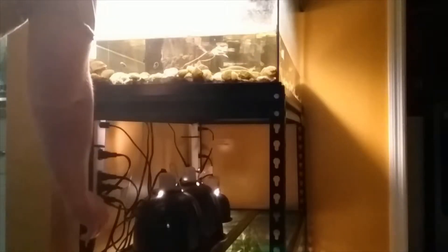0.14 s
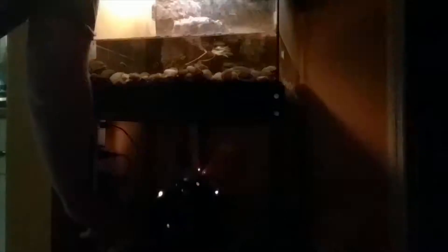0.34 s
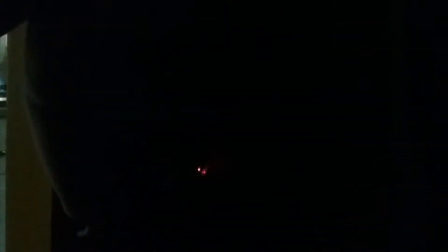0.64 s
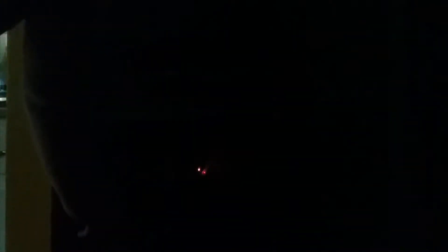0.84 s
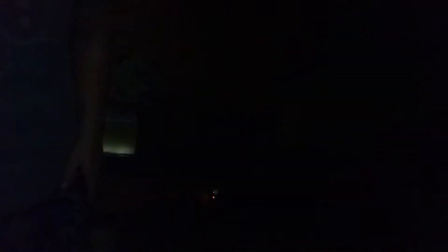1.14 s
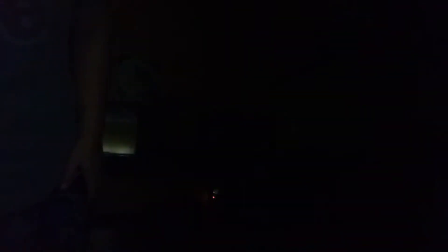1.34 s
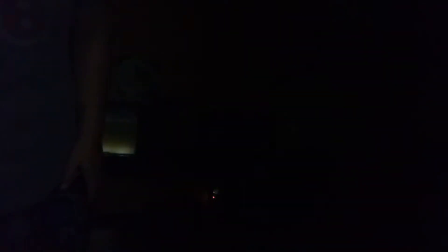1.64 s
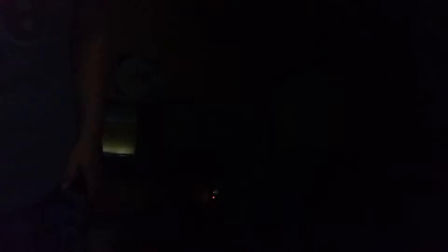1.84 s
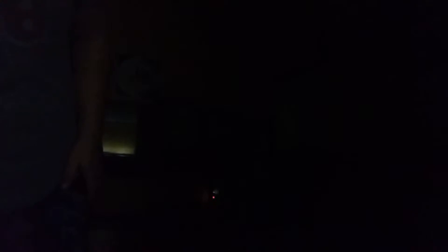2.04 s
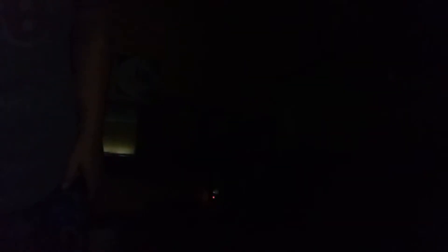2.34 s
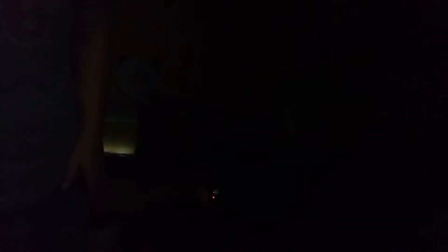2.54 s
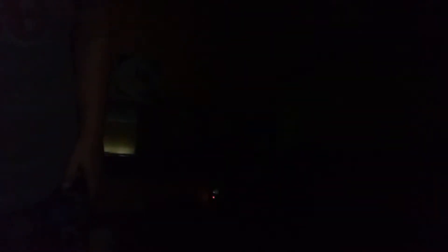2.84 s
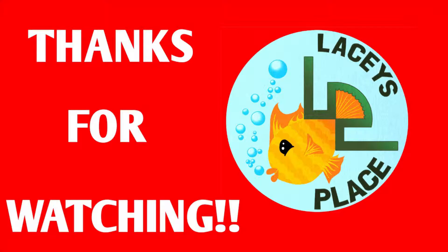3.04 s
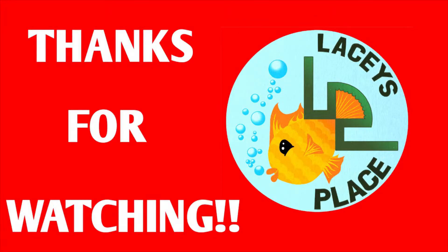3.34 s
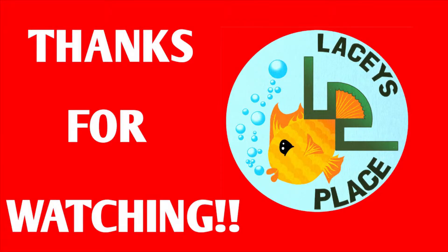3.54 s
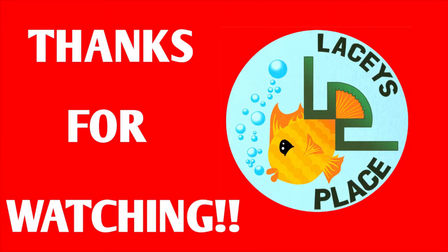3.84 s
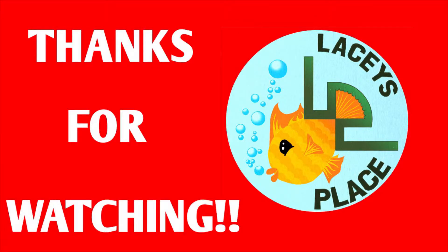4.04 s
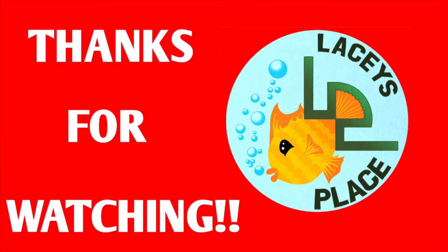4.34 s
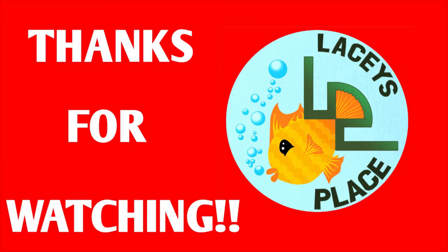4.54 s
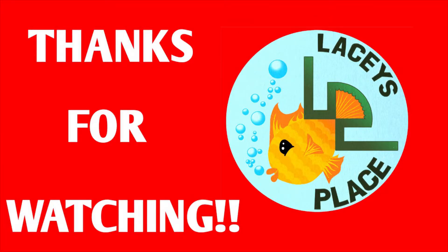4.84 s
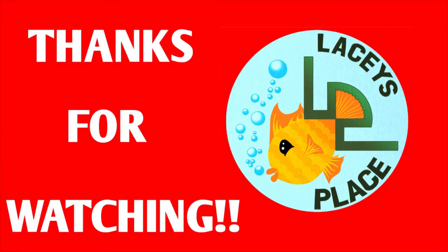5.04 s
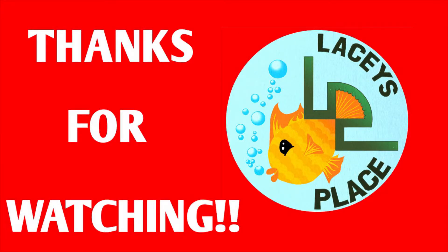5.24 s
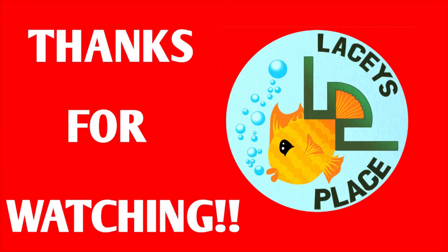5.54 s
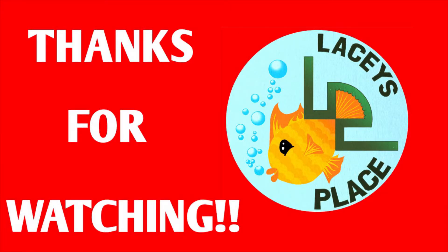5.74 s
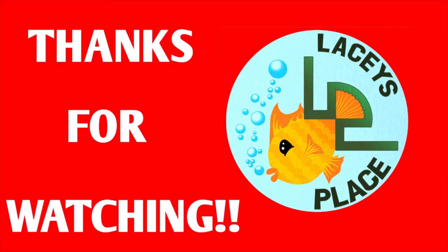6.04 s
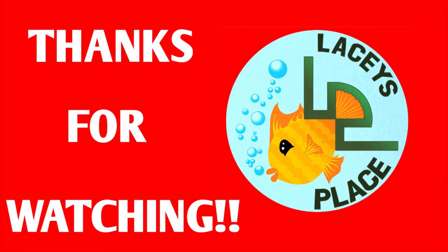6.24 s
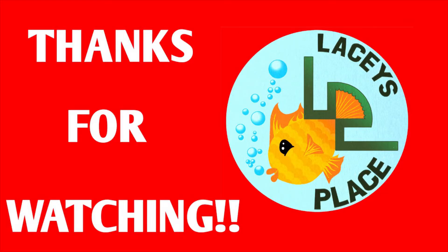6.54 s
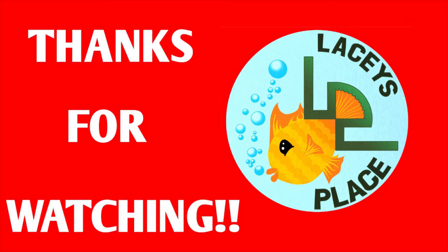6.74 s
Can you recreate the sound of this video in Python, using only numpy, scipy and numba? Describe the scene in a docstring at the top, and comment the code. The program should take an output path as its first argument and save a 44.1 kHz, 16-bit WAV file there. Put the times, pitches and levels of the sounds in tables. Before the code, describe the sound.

Aquarium filters pour bubbling water over a steady pump hum in a small room, with a light switch click and a few ticks.

```python
"""Aquarium filters in a small, hard room

Filters pour water into fish tanks over the hum of their mains pumps. Countless bubbles ring in the
falling water; now and then a larger one bursts with a bright spit. Two close microphones on a hand-held
camera listen beside a pump as a light is switched off, then, from 0.87 s, further into the room, with
three dry ticks and one bump on the camera. Silence from 6.35 s."""
import sys
import numpy as np
from scipy import signal
from scipy.fft import rfft, irfft
from scipy.io import wavfile
from numba import njit

SR = 44100
rng = np.random.default_rng(int(sys.argv[2]) if len(sys.argv) > 2 else 0)


def store_wav(level_fs):
    """Save 16-bit WAV to argv[1]."""
    pcm = np.round(np.clip(np.atleast_2d(level_fs), -1, 1) * 32767)
    wavfile.write(sys.argv[1], SR, pcm.T.astype(np.int16))


N = 303849
TIME_S, BINS_HZ = np.arange(N) / SR, np.fft.rfftfreq(N, 1 / SR)
CLICK_BINS_HZ = np.fft.rfftfreq(128, 1 / SR)
MIC_DELAY_S = 20 / SR

# NEAR: beside the pump. FAR: out in the room.
# water spectrum (frequency [Hz], density [dB per Hz])
NEAR_WATER = [(35, -100), (70, -82.5), (140, -72.5), (300, -72.5), (600, -70), (800, -71), (1200, -74.5),
              (1700, -77), (3000, -81), (4300, -89.5), (7000, -90), (9500, -93.5), (13000, -86.5),
              (15400, -87)]
FAR_WATER = [(35, -105), (70, -77), (140, -76.5), (300, -77.5), (600, -71.5), (800, -73), (1200, -77.5),
             (1700, -81.5), (3000, -86.5), (4300, -93), (5000, -91.5), (7000, -93.5), (9500, -96.5),
             (13000, -92), (15400, -90.5)]
# outflow swell, used about its mean (time [s], gurgle [dB], splash [dB])
NEAR_FLOW = [(0.0, -37.5, -47.5), (0.802, -37, -49.5), (0.86, -39.5, -48.5)]
FAR_FLOW = [(0.88, -43.5, -54), (1.42, -40.5, -51), (3.32, -42.5, -56), (3.36, -41, -48.5),
            (3.73, -40.5, -50.5), (6.0, -41.5, -50.5), (6.2, -42.5, -57.5), (6.32, -44, -52)]
# bubbles' part of the water (frequency [Hz], power share [ratio])
BUBBLE_SHARE = [(150, 0.033), (400, 0.65), (1200, 0.6), (4000, 0.76), (8000, 0.94), (14000, 0.71)]
# unevenness of bubble strength (pitch [Hz], share of spread [ratio])
BUBBLE_SPREAD = [(1500, 1), (3000, 1), (5000, .6), (14000, .65)]
# surface bursts (time [s], relative level [dB], direct over room [dB], body over spit [dB])
POPS = [(0.286, -41, -5, -11.5), (1.201, -47.5, -13, -7), (1.64, -46, -17, -12), (2.012, -40.5, -19, -17.5),
        (2.221, -52.5, -15, 1), (2.490, -45, -18, -6), (2.717, -48, -12, -16), (2.846, -48, -10, -18),
        (2.985, -49, -17, 4.5), (3.144, -47.5, -8.5, -2.5), (3.765, -45, -12.5, -2),
        (3.869, -48.5, -13, -12.5), (4.143, -61, -13, -12), (4.195, -52, -5, 8), (4.558, -46.5, -7, -8),
        (4.640, -42, -19, 2.5), (5.553, -39.5, -16, -28), (6.149, -46.5, -10, -6)]
# spectra of a burst's two parts (frequency [Hz], gain [dB])
POP_SPIT = [(2000, -32), (5000, -15), (9500, -2), (12500, 4), (15400, 5.5)]
POP_BODY = [(150, -31.5), (500, -7), (1400, 12.5), (3000, 5.5), (6000, 1.5), (10000, -18.5)]
# single bubbles and, at 4.667 s, the faint bright ring of the knock on the camera
# (time [s], pitch [Hz], relative level [dB])
SINGLE_RINGS = [(0.02, 1166, -41), (0.29, 2900, -47), (0.395, 800, -39), (0.400, 950, -39.5),
                (0.503, 7250, -47), (0.674, 5250, -50.5), (0.728, 614, -39.5), (1.302, 1320, -40.5),
                (1.661, 3100, -50.5), (1.948, 6250, -49), (3.692, 2430, -46), (4.16, 750, -36.5),
                (4.193, 1960, -48), (4.63, 1420, -43.5), (4.667, 2800, -56), (4.791, 1050, -44.5),
                (5.232, 2690, -45.5), (5.359, 1130, -43.5), (5.686, 3530, -54), (5.87, 1310, -49.5),
                (5.964, 4060, -49), (6.262, 1717, -44.5)]
# pump lines (frequency [Hz], left [dB], right [dB], left lead [rad])
NEAR_HUM = [(60, -70, -72, 0), (115.8, -66, -54, 0), (120, -47.8, -49, .3), (240, -50, -66, -.8),
            (360, -50, -47, -1.5), (480, -45, -55, -.4), (575, -47, -51, .3), (597, -50, -50, .4)]
FAR_HUM = [(120, -50.7, -62, 1.2), (155, -56.5, -59, -2.0), (180, -57.5, -57, -1.4), (240, -57, -55, 1.3),
           (360, -52.3, -59.5, 0), (420, -59, -61, .4), (480, -57.5, -55, -.6), (540, -68, -60, 0),
           (600, -56.5, -62, 0), (660, -56.5, -62, .4), (720, -57.5, -55.5, .2), (780, -56, -57.5, .2),
           (1020, -68, -66, 0), (1200, -66, -65, 0)]
# switch contacts (time [s], relative level [dB], direct over room [dB])
SWITCH_CONTACTS = [(0.568, -33, -8), (0.575, -31, -5.5)]
# switch case response (frequency [Hz], gain [dB])
SWITCH_CASE = [(300, -30), (1100, 9), (1700, -11), (2500, 3.5), (3600, 0.5), (5500, -3.5), (8500, -9.5),
               (11500, -2.5), (14000, 6.5), (15400, 8.5)]
# dry ticks (time [s], level as a 1 ms burst [dB], decay [s])
TICKS = [(1.3991, -36, .0006), (3.3408, -40.5, .001), (3.3701, -24.5, .0019)]
# tick spectrum (frequency [Hz], gain [dB])
TICK_COLOUR = [(1000, -19.5), (2500, -12), (3700, -8), (5700, -11), (8500, -4), (11500, -1), (15000, 3),
               (17000, -15.5)]
# camera body modes (frequency [Hz], relative level [dB], t60 [s])
BUMP_MODES = [(100, 9, 0.062), (160, 11, 0.045), (235, 3, .025), (330, 4.5, .025)]
# room decay (frequency [Hz], t60 [s])
ROOM_T60 = [(200, 0.56), (1500, 0.32), (6000, 0.4), (15000, 0.35)]
# standing waves (frequency [Hz], width [Hz], lift [dB])
ROOM_MODES = [(113.7, 5.4, 6), (159, 7.6, 5.5), (225, 35, 8), (280, 20, 2), (350, 43, 5.5), (471, 14, 7),
              (537, 18, 3)]
# likeness of the room sound at the two microphones (frequency [Hz], correlation [ratio])
MIC_CORRELATION = [(50, 0.95), (120, 0.95), (300, 0.84), (550, 0.48), (850, 0.21), (1500, -0.56),
                   (2300, 0.28), (3200, 0.21), (5000, 0.0079)]
# part subtracted from the other microphone (frequency [Hz], gain [ratio])
CROSSFEED = [(100, 1), (2000, 0.92), (4400, 0.69), (8000, 0.62), (14000, 0.43)]
# listening position (time [s], gain [ratio])
NEAR_GATE = [(0, 1), (0.868, 1), (0.8695, .12), (0.873, .12), (0.8745, 0)]
FAR_GATE = [(0.873, 0), (0.8745, 1), (6.318, 1), (6.328, .06), (6.345, 0)]
# channel balance (frequency [Hz], left over right [dB])
BALANCE = [(100, 1.4), (400, 1.5), (1200, -0.62), (4000, -0.69), (10000, -1.1), (15000, -.2)]


def running_water(count=4, flutter_db=0.73, flutter_hz=33.0):
    """Bubbling outflows over the smooth wash of their streams; the spray flutters."""
    share = np.clip(read(BUBBLE_SHARE, BINS_HZ), 0, 1)
    outflows = unit_rms(sum(bubbles() for _ in range(count)))
    wash = rng.standard_normal((2, N))
    water = shaped(outflows, np.sqrt(share)) + shaped(wash, np.sqrt(1 - share))
    spray = water - lowpass(water, hz=2500)
    return water - spray + spray * gain_of(flutter_db * drift(flutter_hz))


def bubbles(count=4400, spread_db=4.0, decay_cycles=6.87, rise=0.011, direct_db=-9.0):
    """One outflow's bubbles in the room; most are faint, the smallest are the most even."""
    when, pitch, force, sustain = rng.random((count, 4)).T
    hz = 220 * (16000 / 220) ** pitch
    strength = np.minimum(-np.log(1 - force), 4) - np.sqrt(2)
    amplitude = hz * gain_of(spread_db * read(BUBBLE_SPREAD, hz) * strength)
    sound = ring((when * N).astype(int), hz / SR, amplitude, decay_cycles * (.5 + sustain), rise)
    return unit_rms(signal.oaconvolve(sound[None], room(direct_db), axes=1)[:, :N])


@njit
def ring(start, cycles_per_sample, amplitude, decay_cycles, rise):
    """Each bubble is a dying sine whose pitch rises as it nears the surface."""
    out = np.zeros(N)
    for k in range(len(start)):
        for i in range(min(int(5 * decay_cycles[k] / cycles_per_sample[k]), N - start[k])):
            turns = i * cycles_per_sample[k]
            age = turns / decay_cycles[k]
            out[start[k] + i] += amplitude[k] * np.exp(-age) * np.sin(2 * np.pi * turns * (1 + rise * age))
    return out


def surging(water, spectrum, flow, splash_follow=0.53, fizz_follow=0.69):
    """Colours the water; gurgle, splash and fizz swell with the flow over a steady rumble."""
    water = shaped(water, gain_of(read(spectrum, BINS_HZ)) * np.sqrt(SR / 2))
    s, *levels = np.transpose(flow)
    span_s = np.linspace(s[0], s[-1])
    gurgle_db, splash_db = (np.interp(TIME_S, s, db) - np.interp(span_s, s, db).mean() for db in levels)
    rumble, low, mid = (lowpass(water, hz) for hz in (200, 1800, 8000))
    gurgle = (low - rumble) * gain_of(gurgle_db)
    splash = (mid - low) * gain_of(splash_follow * splash_db)
    fizz = (water - mid) * gain_of(fizz_follow * splash_db)
    return rumble + gurgle + splash + fizz


def pops(gain_db=28.0):
    """Bubbles burst at the surface: a bright spit with more or less body."""
    out = np.zeros((2, N))
    spit = gain_of(read(POP_SPIT, CLICK_BINS_HZ))
    for s, db, direct_db, body_db in POPS:
        body = gain_of(body_db + read(POP_BODY, CLICK_BINS_HZ))
        add(out, s, gain_of(db + gain_db) * snap(spit + body, direct_db))
    return out


def single_rings(decay_cycles=6.0, rise=0.00276, gain_db=-2.5, direct_db=-7.5):
    """Single bubbles, and once the knocked camera, ring into the room; levels as for a 50 ms note."""
    out = np.zeros((2, N))
    for s, hz, db in SINGLE_RINGS:
        turns = hz * np.arange(SR // 10) / SR
        age = turns / decay_cycles
        note = np.exp(-age) * np.sin(2 * np.pi * turns * (1 + rise * age))
        heard = signal.oaconvolve(note[None], room(direct_db), axes=1)
        add(out, s, gain_of(db + gain_db) * unit_rms(heard) * np.sqrt(SR / 20 / heard.shape[1]))
    return out


def pump_hum(lines, waver_db, wander_rad, waver_hz=8.1, restless_hz=340.):
    """Mains pump lines waver in level and phase, less so below restless_hz."""
    out = np.zeros((2, N))
    drifts = [drift(waver_hz) for _ in range(2)]
    for hz, left_db, right_db, lead_rad in lines:
        swell, sway = (min(hz / restless_hz, 1) * np.roll(d, rng.integers(N)) for d in drifts)
        phase = 2 * np.pi * (hz * TIME_S + rng.random()) + wander_rad * sway
        pair = np.array([gain_of(left_db) * np.sin(phase + lead_rad), gain_of(right_db) * np.sin(phase)])
        out += np.sqrt(2) * unit_rms(gain_of(waver_db * swell)) * pair
    return out


def light_switch(gain_db=28.0):
    """The rocker flips and strikes its stop; each contact rings the plastic case."""
    out = np.zeros((2, N))
    case = gain_of(read(SWITCH_CASE, CLICK_BINS_HZ))
    for s, db, direct_db in SWITCH_CONTACTS:
        add(out, s, gain_of(db + gain_db) * snap(case, direct_db))
    return out


def ticks(room_db=1.2, left_db=-3.0):
    """A small hard thing rings close by: right microphone first, then left, then the room."""
    direct, echo = np.zeros((2, 2, N))
    t = np.arange(1024) / SR
    colour = gain_of(read(TICK_COLOUR, np.fft.rfftfreq(len(t), 1 / SR)))
    for s, db, decay_s in TICKS:
        burst = irfft(rfft(rng.standard_normal(len(t))) * colour) * np.exp(-t / decay_s)
        tick = gain_of(db) * unit_rms(burst)[None] * np.sqrt(SR / 1000 / len(t))
        add(direct, s, tick * [[0], [1]])
        add(direct, s + MIC_DELAY_S, tick * [[gain_of(left_db)], [0]])
        add(echo, s, gain_of(room_db) * signal.oaconvolve(tick, room(direct_db=-19), axes=1))
    return direct + microphones(echo)


def bump(at_s=4.6668, peak_db=-20, low_cut_hz=84.7, right_db=-2.0):
    """A dull knock through the camera body drives the channels in opposite directions."""
    out, t = np.zeros((2, N)), np.arange(SR // 8) / SR
    modes = sum(gain_of(db - 60 * t / t60_s) * np.sin(2 * np.pi * hz * t) for hz, db, t60_s in BUMP_MODES)
    knock = signal.sosfilt(signal.butter(3, low_cut_hz, "high", fs=SR, output="sos"), modes)
    pair = np.array([knock, -gain_of(right_db) * knock])
    add(out, at_s, gain_of(peak_db) * pair / abs(pair).max())
    return out


def snap(colour, direct_db):
    """A short coloured click, heard directly and through the room."""
    click = np.fft.fftshift(irfft(colour))
    return signal.oaconvolve(room(direct_db, direct_decay_s=0.002), click[None], "same", axes=1)


def room(direct_db, direct_decay_s=0.0026):
    """Unit-energy paths to both microphones: a brief direct cluster and a diffuse tail."""
    hz, frame_s, noise = signal.stft(rng.standard_normal((2, SR // 2)), SR, nperseg=256)
    decay = gain_of(-60 * frame_s / read(ROOM_T60, hz)[:, None])
    tail = signal.istft(noise * decay, SR, nperseg=256)[1]
    t = np.arange(tail.shape[1]) / SR
    direct = rng.standard_normal(tail.shape) * np.exp(-t / direct_decay_s)
    return unit_rms(unit_rms(tail) + gain_of(direct_db) * unit_rms(direct)) / np.sqrt(len(t))


def standing_waves(water):
    """Low room resonances lift narrow bands of the water's rumble."""
    lift_db = sum(db / (1 + (2 * (BINS_HZ - hz) / width_hz) ** 2) for hz, width_hz, db in ROOM_MODES)
    return shaped(water, gain_of(lift_db))


def microphones(field):
    """A close pair, widened: each channel subtracts the other, delayed, and is equalised flat."""
    alike = np.clip(read(MIC_CORRELATION, BINS_HZ), -.99, .99)
    other = np.clip(read(CROSSFEED, BINS_HZ), 0, 1) * np.exp(-2j * np.pi * BINS_HZ * MIC_DELAY_S)
    to_mid, to_side = np.sqrt(1 + alike) * (1 - other), np.sqrt(1 - alike) * (1 + other)
    norm = np.sqrt(2 * (abs(to_mid) ** 2 + abs(to_side) ** 2))
    mid = shaped(field[0] + field[1], to_mid / norm)
    side = shaped(field[0] - field[1], to_side / norm)
    return np.array([mid + side, mid - side])


def gain_of(db):
    """Decibels to amplitude."""
    return 10 ** (np.asarray(db) / 20)


def unit_rms(x):
    """Scales to rms 1."""
    return x / np.sqrt(np.mean(x ** 2) + 1e-20)


def read(table, hz):
    """Interpolates on a log frequency axis."""
    table_hz, value = np.transpose(table)
    return np.interp(np.log(hz + 1), np.log(table_hz + 1), value)


def shaped(x, gain):
    """Filters by a gain per bin."""
    return irfft(rfft(x) * gain, N)


def lowpass(x, hz):
    """Zero phase, 24 dB per octave."""
    return shaped(x, 1 / (1 + (BINS_HZ / hz) ** 4))


def drift(hz):
    """Random motion of rms 1, up to about hz."""
    return unit_rms(shaped(rng.standard_normal(N), np.exp(-(BINS_HZ / hz) ** 2) * (BINS_HZ > 0)))


def add(mix, at_s, sound):
    """Mixes in a stereo sound."""
    part = mix[:, round(at_s * SR):][:, :sound.shape[1]]
    part += sound[:, :part.shape[1]]


def scene():
    """Two listening positions in turn; the level dips briefly between them."""
    near, far = (np.interp(TIME_S, *np.transpose(gate)) for gate in (NEAR_GATE, FAR_GATE))
    water = running_water()
    near_water = near * surging(water, NEAR_WATER, NEAR_FLOW)
    far_water = far * surging(standing_waves(water), FAR_WATER, FAR_FLOW)
    events = (near + far) * (pops() + single_rings() + light_switch())
    heard = microphones(near_water + far_water + events) + ticks()
    near_hum = near * pump_hum(NEAR_HUM, waver_db=2.7, wander_rad=.3)
    far_hum = far * pump_hum(FAR_HUM, waver_db=2.36, wander_rad=.4)
    return heard + near_hum + far_hum + bump()


def record(dry, low_cut_hz=40, high_cut_hz=15780):
    """Left slightly fuller, right slightly brighter; then low cut and band limit."""
    balance_db = read(BALANCE, BINS_HZ)
    coloured = shaped(dry, gain_of(np.array([balance_db, -balance_db]) / 2))
    coloured = signal.sosfilt(signal.butter(2, low_cut_hz, "high", fs=SR, output="sos"), coloured)
    band_limit = signal.firwin(511, high_cut_hz, window=("kaiser", 9), fs=SR)
    return signal.oaconvolve(coloured, band_limit[None], "same")


dry = scene()
out = record(dry)
store_wav(out)
```